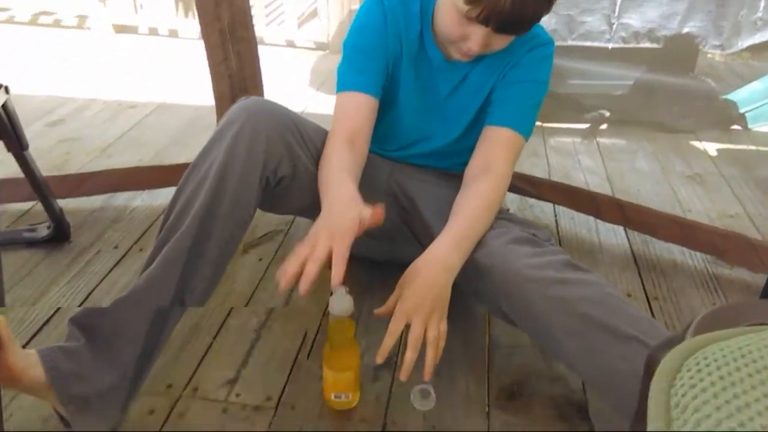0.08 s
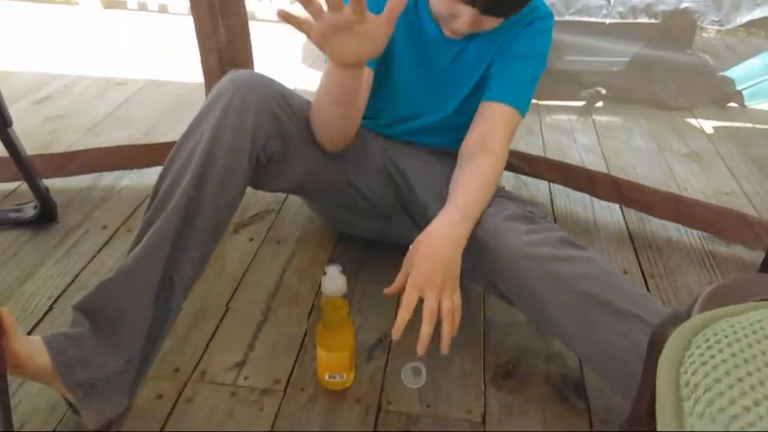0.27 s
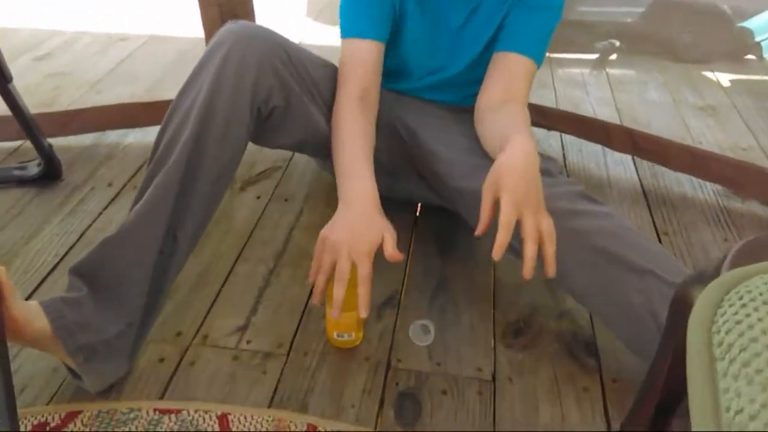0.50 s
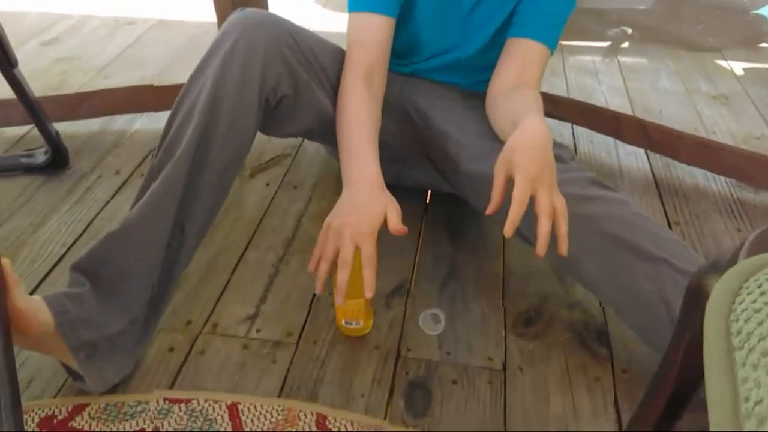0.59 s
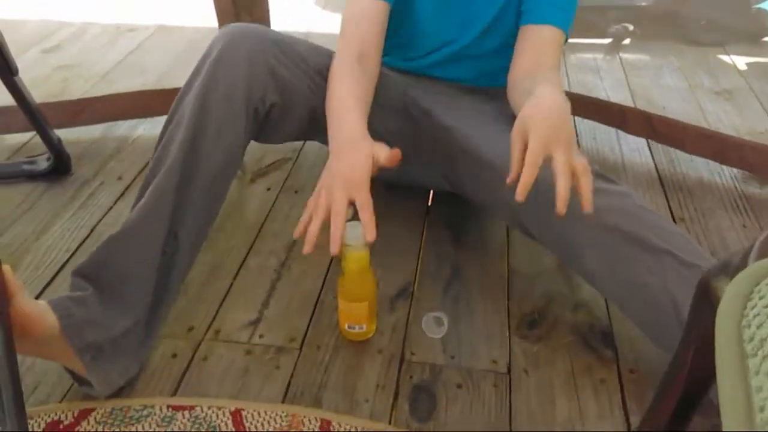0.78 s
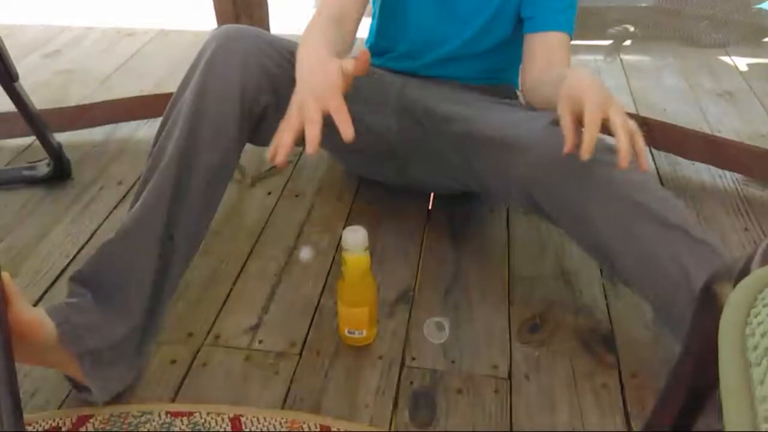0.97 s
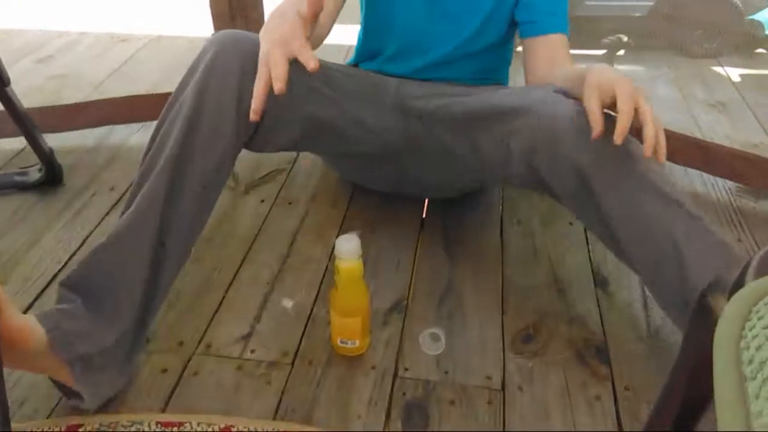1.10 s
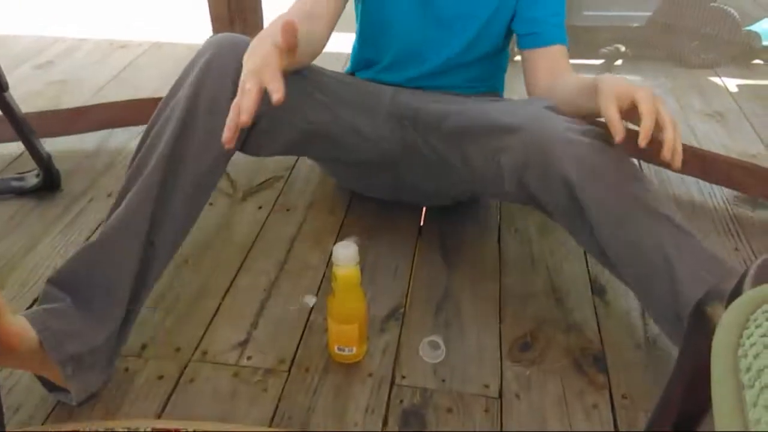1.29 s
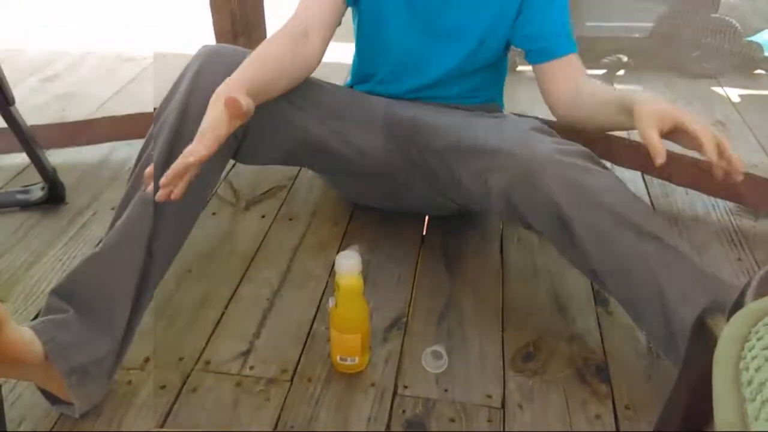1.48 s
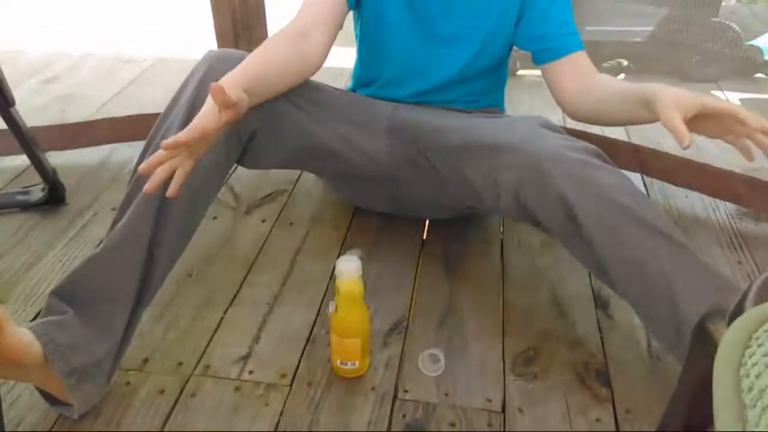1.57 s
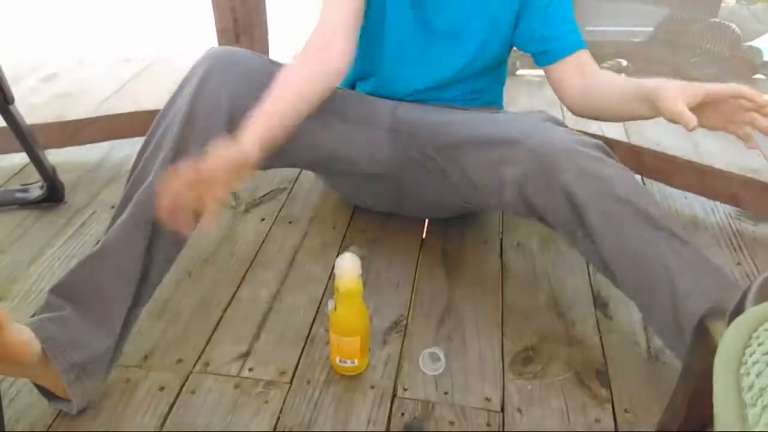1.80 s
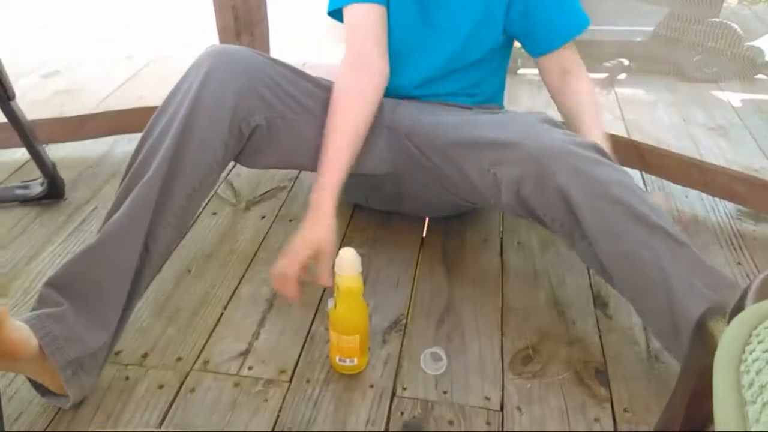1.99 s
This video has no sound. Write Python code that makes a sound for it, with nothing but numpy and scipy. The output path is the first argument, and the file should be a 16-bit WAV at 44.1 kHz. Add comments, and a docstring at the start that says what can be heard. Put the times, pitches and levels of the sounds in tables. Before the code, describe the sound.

Close to the microphone on a wooden porch, a marble-sealed soda bottle opens with one sharp pop, a spurt of gas and a thud. Quick glass clinks follow, then faint fizzing and a few light plastic clicks over quiet outdoor air.

```python
"""On a wooden porch, a palm slams the plastic plunger of a glass soda bottle sealed by a marble.
The marble cracks free and rings the glass, gas rushes out of the neck and the bottle thumps the boards.
The loose marble clinks, then tiny bursting bubbles fizz and settle. The plastic cap clicks and leaks
a little gas as the hand lifts away. Behind it are soft outdoor air, a rustle of clothes and
faint, bird-like whistles."""
import sys
import numpy as np
from scipy import signal
from scipy.fft import rfft, irfft, next_fast_len
from scipy.io import wavfile
from scipy.ndimage import map_coordinates

SR = 44100
rng = np.random.default_rng(int(sys.argv[2]) if len(sys.argv) > 2 else 0)


def inscribe(sig):
    """Save sig as 16-bit PCM at rate SR to the path in sys.argv[1].

    A 1-D sig is mono; a 2-D sig holds one channel per row.
    Samples are clipped to [-1, 1] before scaling.
    """
    pcm = np.round(np.clip(np.atleast_2d(sig).T, -1, 1) * 32767)
    wavfile.write(sys.argv[1], SR, pcm.astype(np.int16))


N = 88200  # samples: 2 seconds

# A "colour" says how strong low and high pitches are. A "fade" is the time taken to fall by 60 dB.
# Levels in colours, notes and tone bands are relative: they set the balance within that sound.
# colour of the outdoor air (frequency [Hz], level [dB])
AIR_COLOUR = [(25, -11.5), (50, -11), (110, 1.5), (250, -1), (500, -6.5), (1200, -9.5), (2700, -14),
              (4500, -27.5), (7500, -32.5), (15500, -29.5)]
# far-off whistles (time [s], length [s], start pitch [Hz], end pitch [Hz], level [dB])
WHISTLES = [(-.06, .2, 3110, 2760, -73), (1.189, .22, 3364, 2940, -75), (1.971, .06, 3870, 3740, -68.5)]
# colour of rubbing cloth (frequency [Hz], level [dB])
CLOTH_COLOUR = [(200, -5), (900, -7), (1600, -4.5), (2500, 5), (3600, -7), (5500, -16), (15500, -27)]
# how long the porch echoes (frequency [Hz], fade [s])
ECHO_FADES = [(150, 0.24), (2500, 0.23), (8000, 0.17), (15000, 0.066)]

# how the foam swells and settles (time [s], level [dB])
FOAM_LEVELS = [(0, -76), (.2, -74), (.26, -62), (.315, -54.5), (.366, -46), (.42, -51), (.488, -59.5),
               (.515, -54), (.61, -55.5), (.73, -61), (.79, -59.5), (.92, -64), (.975, -59), (1.02, -57.5),
               (1.1, -68), (1.4, -72.5), (2, -84)]
# the foam's dull colour (frequency [Hz], level [dB])
FOAM_COLOUR = [(100, -23.5), (250, -5.5), (550, 6), (1100, 1.5), (2600, 1.5), (3700, -5.5), (5500, -13),
               (7500, -19.5), (12000, -34), (15500, -37.5)]
# how the fine fizz comes and goes (time [s], level [dB])
FIZZ_LEVELS = [(0, -88), (.2, -77), (.3, -58), (.37, -61), (.488, -80), (.512, -68), (.56, -73), (.62, -73),
               (.735, -74), (.83, -66), (.89, -74.5), (1.0, -64), (1.1, -83), (1.37, -85), (1.68, -74.5),
               (1.85, -80.5), (2, -77)]
# the fizz's bright colour (frequency [Hz], level [dB])
FIZZ_COLOUR = [(3000, -26), (7600, -4.5), (8300, 5.5), (10000, 2), (11400, -5.5), (12300, -22.5),
               (15500, -19.5)]
# small bursts in the foam (time [s], level [dB])
FOAM_BURSTS = [(.503, -73.5), (0.586, -66), (0.622, -62), (.667, -65), (0.696, -69.5), (1.945, -70.5)]

# fingers click and brush the cap (time [s], level [dB], fade [s], treble cutoff [Hz])
CAP_TOUCHES = [(.085, -52.5, 0.064, 2320), (0.8348, -33, 0.018, 11000), (0.8371, -33.5, 0.013, 11000),
               (.8430, -52, 0.11, 11000), (0.859, -47.5, 0.054, 7000), (.986, -42.5, 0.03, 2000),
               (1.083, -49, 0.021, 1700), (1.212, -55.5, .03, 2192), (1.292, -60, 0.043, 6000)]
# notes the plastic cap rings with (frequency [Hz], level [dB], fade [s])
CAP_NOTES = [(1030, -11.5, .04), (1490, -10, .04), (2270, 1.5, .032), (2360, -2.5, .025), (2605, -8, .025),
             (3220, -6, .028)]
# colour of a touch on the cap (frequency [Hz], level [dB])
CAP_COLOUR = [(200, -24), (700, -12.5), (1800, -11.5), (2300, 5.5), (3000, -2), (4800, -5.5), (5700, -48),
              (7200, -27), (9000, -13), (11300, -17), (12300, -34), (15500, -34)]
# gas leaks past the plunger (time [s], length [s], level [dB])
LEAKS = [(0.734, 0.066, -57), (0.923, .04, -67.5), (1.198, 0.028, -68)]
# colour of the leaking gas (frequency [Hz], level [dB])
LEAK_COLOUR = [(3000, -33.5), (7400, -15), (9000, 5), (10600, -0.5), (11800, -6.5), (12400, -13),
               (15500, -18)]

# the marble rattles in the neck (time [s], level [dB])
CLINKS = [(.2525, -27), (0.2777, -28), (0.287, -39)]
# tone bands of a clink (frequency [Hz], width [Hz], level [dB])
MARBLE_BANDS = [(2098, 70, -2), (2870, 160, -5), (4100, 400, -22), (6500, 410, -15), (8940, 480, -15),
                (10950, 810, -16)]
# the bottle is driven onto the boards (time [s], level [dB])
THUMPS = [(0.1947, -20.5), (0.2039, -23.5), (.2190, -34), (.2390, -24), (0.2637, -37.5)]
# notes the boards ring with (frequency [Hz], level [dB], fade [s])
BOARD_NOTES = [(105, -16, .13), (136, -13, 0.14), (245, -8, .08), (282, -6, .08), (340, -5, 0.053),
               (368, -4.5, 0.0694), (410, -8.5, 0.01), (657, -12, 0.067), (748, -15, 0.027)]
# the boards rumble as the bottle settles (time [s], level [dB])
RUMBLE_LEVELS = [(.19, -92), (.28, -55), (.42, -53.5), (.49, -52), (.6, -55), (.73, -61.5), (.88, -64),
                 (1.0, -73.5), (1.3, -81)]
# tone bands of that rumble (frequency [Hz], width [Hz], level [dB])
RUMBLE_BANDS = [(110, 26, -11), (141, 16, 3), (205, 36, -2), (560, 10, -10.5)]

# tone bands of gas blowing through the neck (frequency [Hz], width [Hz], level [dB])
NECK_BANDS = [(1300, 250, -12.5), (2300, 390, -9), (2880, 93, 1), (5600, 500, -11.5), (8090, 74, 6.5),
              (8470, 260, 0), (9270, 170, 3.5), (10100, 500, -6), (11450, 700, -8.5)]
# colour of the rushing jet of gas (frequency [Hz], level [dB])
JET_COLOUR = [(60, -28), (200, -5), (340, 0.5), (500, -7.5), (700, -0.5), (1000, -6), (3100, -1),
              (4000, -5.5), (7000, -6.5), (8000, -9.5), (11800, -1), (12300, -6), (15500, -6.5)]
# the plunger strikes and the marble breaks free (time [s], level [dB], fade [s])
CRACKS = [(0.1923, -36, 0.19), (0.2023, -24, .02), (0.205, -10.5, .012), (0.2069, -9.5, .016),
          (0.215, -15, .014)]
# colour of a crack (frequency [Hz], level [dB])
CRACK_COLOUR = [(60, -35), (200, -13), (350, -6.5), (500, -12), (700, -3.5), (950, -15), (1450, 3),
                (1850, -6), (2800, 0.5), (4100, -15), (4700, -10.5), (5200, -12), (5900, -4), (6800, -19),
                (8400, -2.5), (11500, -13.5), (15500, -22.5)]
# notes the glass bottle rings with (frequency [Hz], level [dB], fade [s])
GLASS_NOTES = [(1362, -10, 0.12), (1461, -4.5, 0.1), (1566, -5, .1), (2370, -11, 0.14),
               (2820, -10.5, 0.044), (4745, -7.5, 0.12), (6095, -6, .13), (8265, -4.5, 0.11),
               (8680, -3, 0.18), (9750, -8.5, .13)]


def gain(db):
    """Turn decibels into a number to multiply a sound by."""
    return 10 ** (np.asarray(db) / 20)


def normalise(x):
    """Scale a sound to an average power of 1."""
    return x / np.sqrt(np.mean(x ** 2) + 1e-20)


def value_at(points, hz):
    """Read between (frequency, value) points, giving every octave equal room."""
    frequencies, values = np.transpose(points)
    return np.interp(np.log(hz + 1), np.log(frequencies + 1), values)


def since(start_s):
    """Seconds since the start, zero before it."""
    return np.maximum(np.arange(N) / SR - start_s, 0)


def level_curve(points):
    """Join (time, level) points into a gain for every sample."""
    return gain(np.interp(since(0), *np.transpose(points)))


def filtered(x, response):
    """Turn each frequency of a sound up or down by response(hz)."""
    size = next_fast_len(N + SR // 2)
    return irfft(rfft(x, size) * response(np.fft.rfftfreq(size, 1 / SR)), size)[:N]


def coloured(x, colour):
    """Give a sound a colour and an average power of 1."""
    return normalise(filtered(x, lambda hz: gain(value_at(colour, hz))))


def noise(colour):
    """A steady hiss of the given colour."""
    return coloured(rng.standard_normal(N), colour)


def band_noise(bands):
    """Hiss that rings in a few tone bands, like breath blown through a tube."""
    def response(hz):
        return sum((-1) ** k * gain(db) * 1j * hz * width / (centre ** 2 - hz ** 2 + 1j * hz * width)
                   for k, (centre, width, db) in enumerate(bands))
    return normalise(filtered(rng.standard_normal(N), response))


def strike(start_s, fade_s, rise_s=0.000072):
    """The loudness of a hit: it jumps up, then dies away."""
    t = since(start_s)
    return (1 - np.exp(-t / rise_s)) * gain(-60 * t / fade_s)


def ring(start_s, notes, rise_s=.0002, scatter_db=4.5):
    """A struck object rings with fading notes, in a different balance each time."""
    t = since(start_s)[:SR // 2 + round(start_s * SR)]
    out = np.zeros(len(t))
    for hz, db, fade_s in notes:
        struck_db = db + scatter_db * rng.standard_normal()
        out += gain(struck_db - 60 * t / fade_s) * np.sin(2 * np.pi * hz * t)
    return np.pad(out * (1 - np.exp(-t / rise_s)), (0, N - len(t)))


def snap(start_s, colour):
    """One sharp click of the given colour, with a total energy of 1."""
    size = next_fast_len(N + SR // 2)
    log_gain = np.log(gain(value_at(colour, np.fft.rfftfreq(size, 1 / SR))))
    # pack the energy at the very start, with nothing ahead of it (minimum phase)
    one_sided = irfft(log_gain, size) * (1 + np.sign(np.fft.fftfreq(size)))
    click = irfft(np.exp(rfft(one_sided)), size)
    return np.pad(click / np.linalg.norm(click), (round(start_s * SR), 0))[:N]


def bubbling(colour, bubbles_per_s=1600, pop_share=0.34):
    """Tiny bubbles burst at random over a hiss; pop_share is their part of the power."""
    pops = (rng.random(N) < bubbles_per_s / SR) * rng.standard_normal(N)
    return np.sqrt(pop_share) * coloured(pops, colour) + np.sqrt(1 - pop_share) * noise(colour)


def outdoor_air(level_db=-65.5):
    """The air makes a low, steady hush."""
    return gain(level_db) * noise(AIR_COLOUR)


def far_whistles(blur_hz=233):
    """Falling, bird-like whistles, blurred by distance."""
    out = np.zeros(N)
    blur = normalise(filtered(rng.standard_normal(N), lambda hz: np.exp(-(hz / blur_hz) ** 2)))
    for start_s, length_s, start_hz, end_hz, db in WHISTLES:
        progress = np.clip(since(start_s) / length_s, 0, 1)
        phase = 2 * np.pi * np.cumsum(start_hz + (end_hz - start_hz) * progress) / SR
        swell = np.sqrt(abs(np.sin(np.pi * progress)))
        out += gain(db) * swell * normalise(blur * np.sin(phase))
    return out


def clothes(peak_s=1.682, width_s=0.083, level_db=-63.5):
    """Cloth rubs in one soft swell as the arms spread."""
    swell = np.exp(-((since(0) - peak_s) / width_s) ** 2)
    return gain(level_db) * swell * noise(CLOTH_COLOUR)


def porch_echo(sound, level_db=-18.5, delay_s=.008):
    """The porch throws back a short, weak echo whose treble dies first."""
    hz, t, spectrum = signal.stft(rng.standard_normal(SR // 2), SR, nperseg=256)
    fading = gain(-60 * t / value_at(ECHO_FADES, hz)[:, None])
    tail = signal.istft(spectrum * fading, SR, nperseg=256)[1]
    delayed = np.pad(tail / np.linalg.norm(tail), (round(delay_s * SR), 0))
    return gain(level_db) * signal.fftconvolve(sound, delayed)[:N]


def fizz(sputter_db=1.5, sputters_per_s=91):
    """Foam rises in the neck under a fine fizz that sputters, wobbling quickly in loudness."""
    foam = level_curve(FOAM_LEVELS) * bubbling(FOAM_COLOUR)
    wobble = map_coordinates(rng.standard_normal(N // 100), [since(0) * sputters_per_s])
    sputter = level_curve(FIZZ_LEVELS) * gain(sputter_db * wobble)
    bursts = sum(gain(db) * strike(start_s, fade_s=0.041) for start_s, db in FOAM_BURSTS)
    return foam + (sputter + bursts) * bubbling(FIZZ_COLOUR)


def cap_clicks(ring_db=-7):
    """Fingers make short, dry clicks on the plastic cap; a softer touch is duller."""
    out = np.zeros(N)
    click = snap(0, CAP_COLOUR)
    for start_s, db, fade_s, cutoff_hz in CAP_TOUCHES:
        contact = signal.fftconvolve(strike(start_s, fade_s) * rng.standard_normal(N), click)[:N]
        plastic = gain(ring_db) * ring(start_s, CAP_NOTES)
        soften = signal.butter(2, cutoff_hz, fs=SR, output="sos")
        out += gain(db) * signal.sosfilt(soften, contact + plastic)
    return out


def gas_leaks(edge_s=0.0039, sag_db_per_s=80):
    """Small spurts of gas slip past the plunger as the hand eases off."""
    out = np.zeros(N)
    hiss = noise(LEAK_COLOUR)
    for start_s, length_s, db in LEAKS:
        t = since(start_s)
        opening = 1 - np.exp(-t / edge_s)
        closing = np.exp(-since(start_s + length_s) / edge_s)
        out += gain(db - sag_db_per_s * t) * opening * closing * hiss
    return out


def marble_clinks():
    """The freed marble knocks dully in the wet neck."""
    knocks = sum(gain(db) * strike(start_s, fade_s=0.033) for start_s, db in CLINKS)
    return knocks * band_noise(MARBLE_BANDS)


def boards():
    """The porch boards thump under the bottle and rumble on."""
    thumps = sum(gain(db) * ring(start_s, BOARD_NOTES, rise_s=.0015) for start_s, db in THUMPS)
    return thumps + level_curve(RUMBLE_LEVELS) * band_noise(RUMBLE_BANDS)


def gas_burst(start_s=0.2073, level_db=-18, rise_s=0.0011, jet_db=-3):
    """Gas rushes through the neck: it weakens while the pressure lasts, then dies quickly."""
    sag_db_per_s, pressure_lasts_s = 231, 0.045
    drop_db, drop_s = 13, 0.019  # the extra fall once the pressure is spent
    t = since(start_s)
    spent = 1 - np.exp(-since(start_s + pressure_lasts_s) / drop_s)
    loudness = gain(level_db - sag_db_per_s * t - drop_db * spent) * (1 - np.exp(-t / rise_s))
    return loudness * (band_noise(NECK_BANDS) + gain(jet_db) * noise(JET_COLOUR))


def plunger_pop(snap_db=12, ring_db=-19):
    """The plunger knocks the marble free: each crack is a snap, a noisy tail and a ring of glass."""
    out = np.zeros(N)
    for start_s, db, fade_s in CRACKS:
        click = gain(snap_db) * snap(start_s, CRACK_COLOUR)
        tail = strike(start_s, fade_s) * noise(CRACK_COLOUR)
        glass = gain(ring_db) * ring(start_s, GLASS_NOTES)
        out += gain(db) * (click + tail + glass)
    return out


def scene():
    """Mix the nearby sounds, their echo and the background into one channel."""
    near = plunger_pop() + boards() + gas_burst() + gas_leaks()
    near += marble_clinks() + cap_clicks() + fizz() + clothes()
    return (near + porch_echo(near) + far_whistles() + outdoor_air())[None]


def record(dry):
    """A small microphone loses the deep bass, rounds the tallest peaks and cuts the highest treble."""
    low_cut_hz, top_hz, overload_level = 80, 15800, .72
    thin = signal.sosfilt(signal.butter(2, low_cut_hz, "highpass", fs=SR, output="sos"), dry[0])
    rounded = thin / (1 + (thin / overload_level) ** 6) ** (1 / 6)
    return filtered(rounded, lambda hz: 1 / (1 + (hz / top_hz) ** 200))[None]


dry = scene()
out = record(dry)
inscribe(out)
```